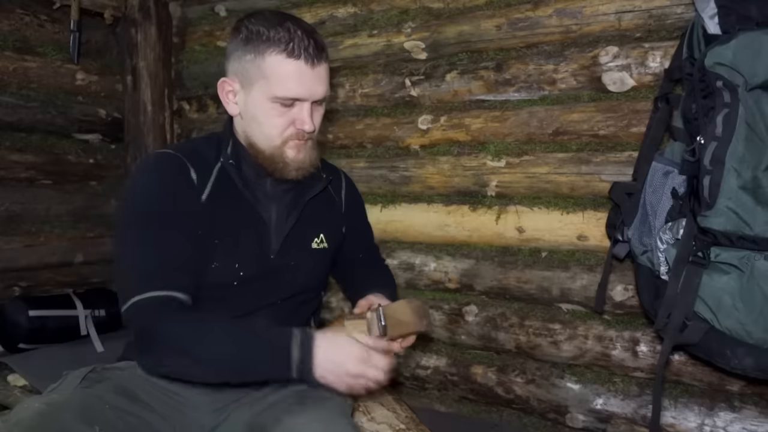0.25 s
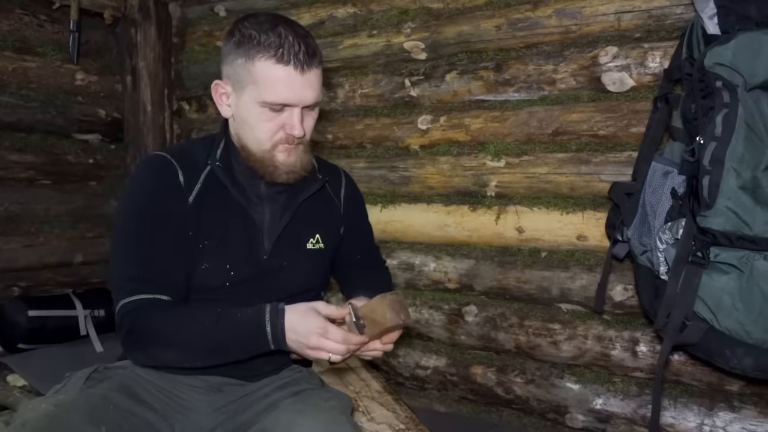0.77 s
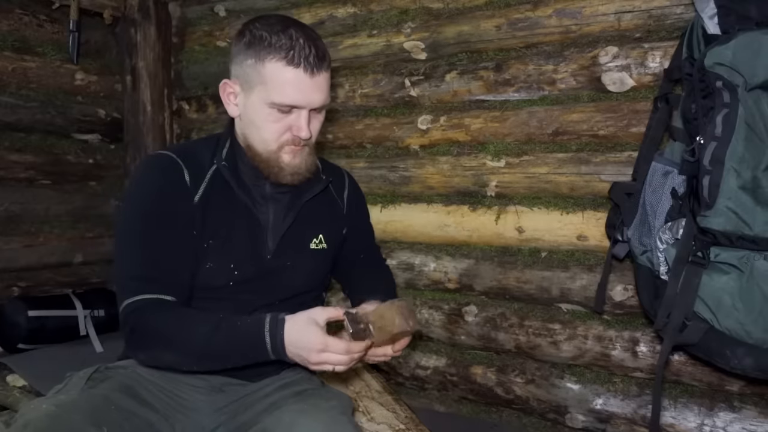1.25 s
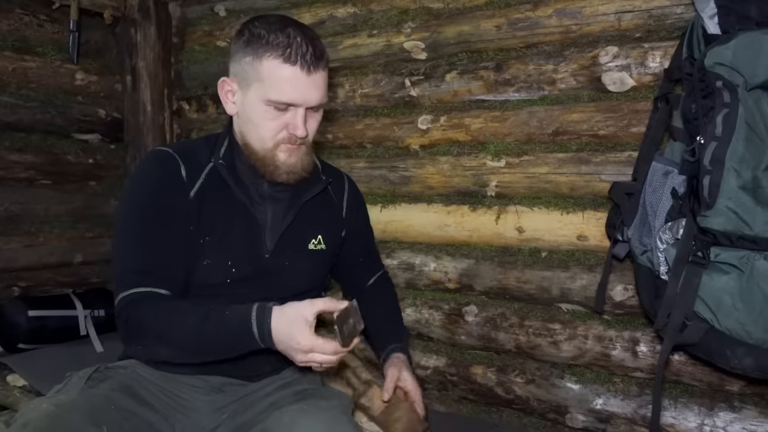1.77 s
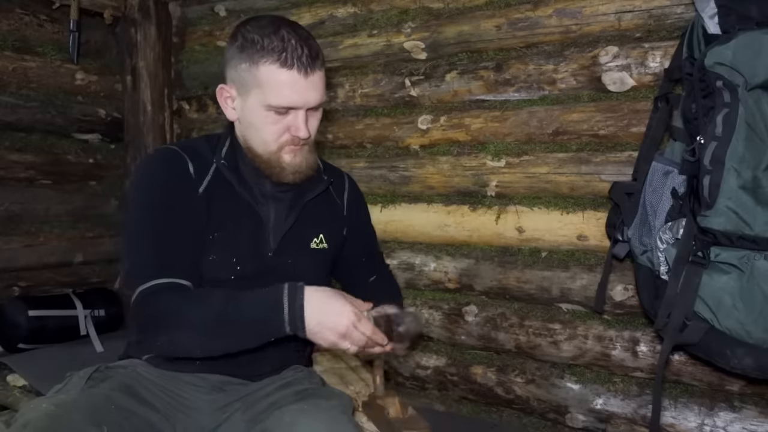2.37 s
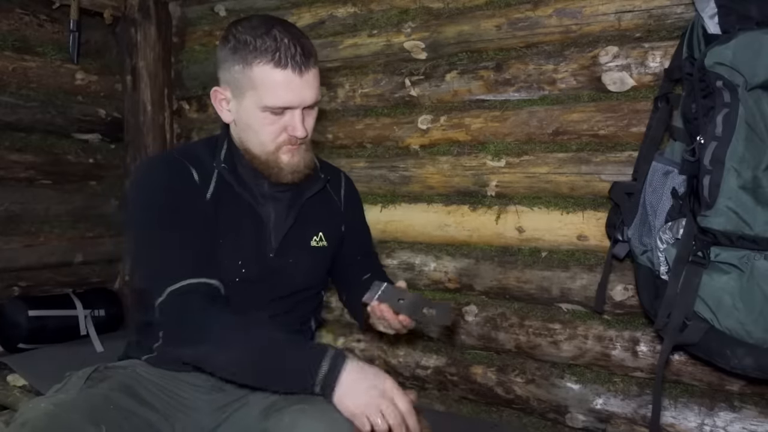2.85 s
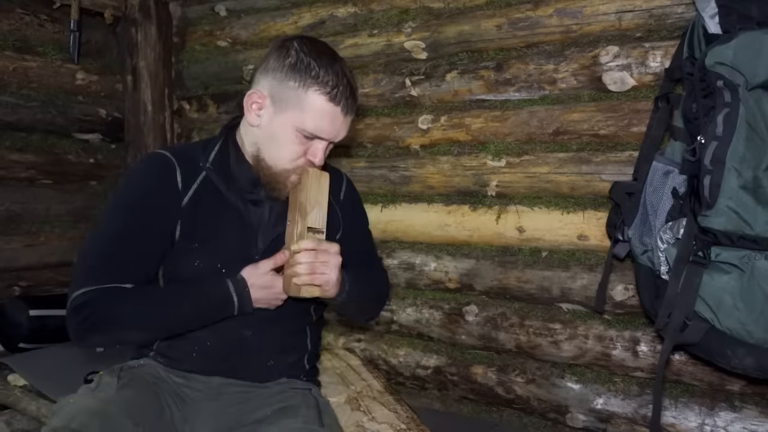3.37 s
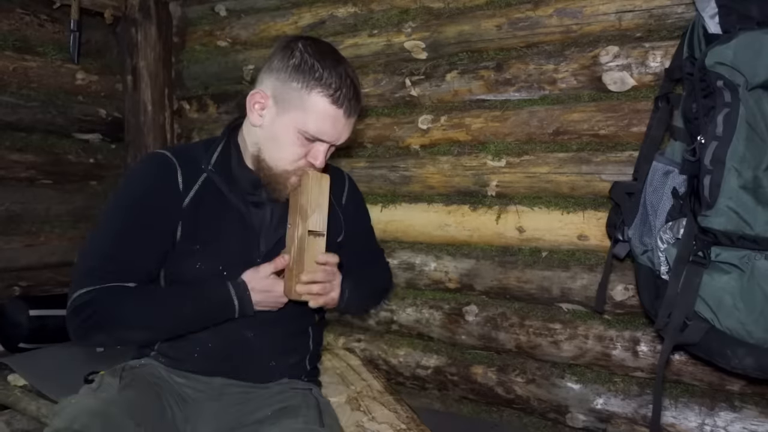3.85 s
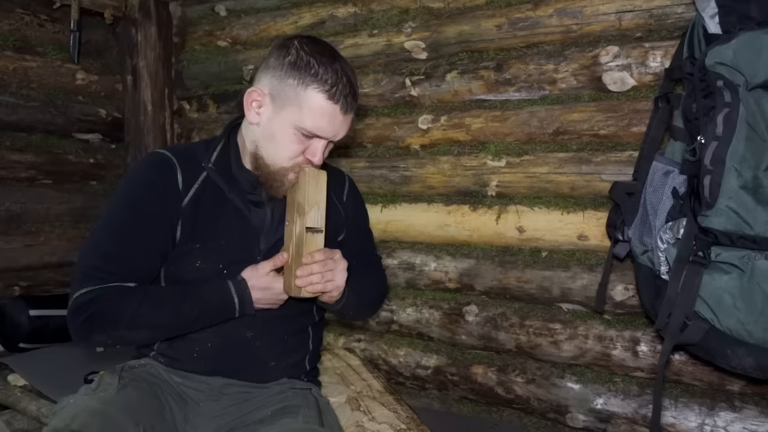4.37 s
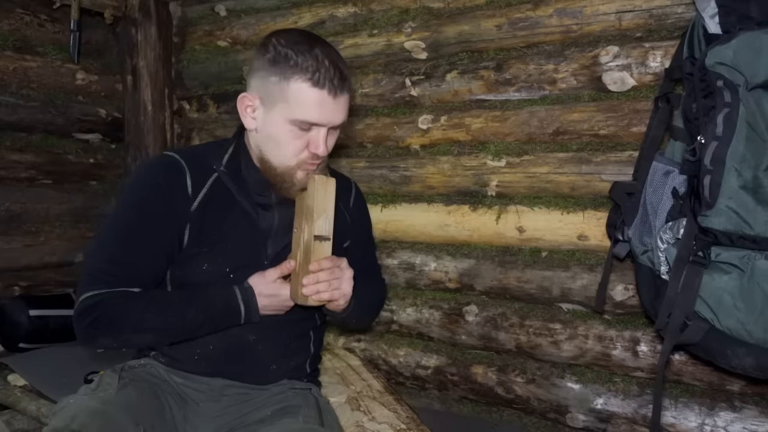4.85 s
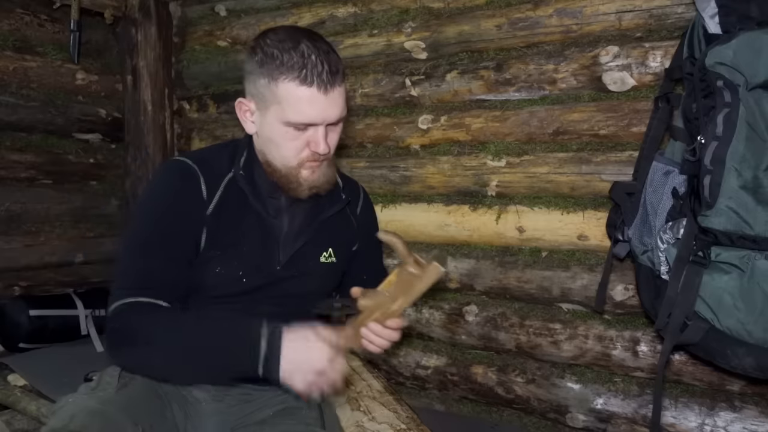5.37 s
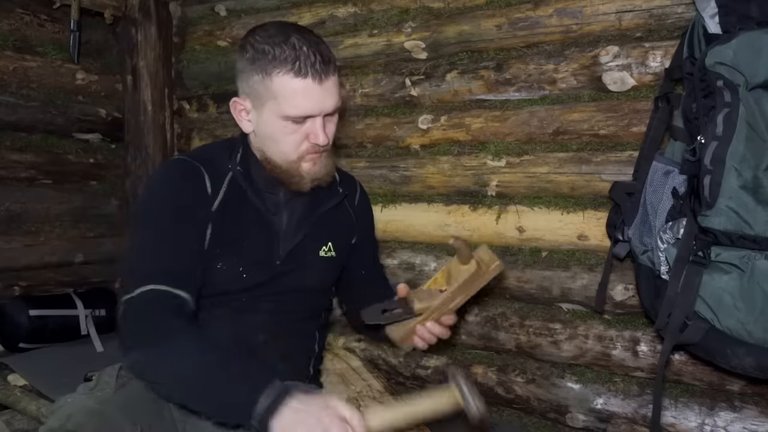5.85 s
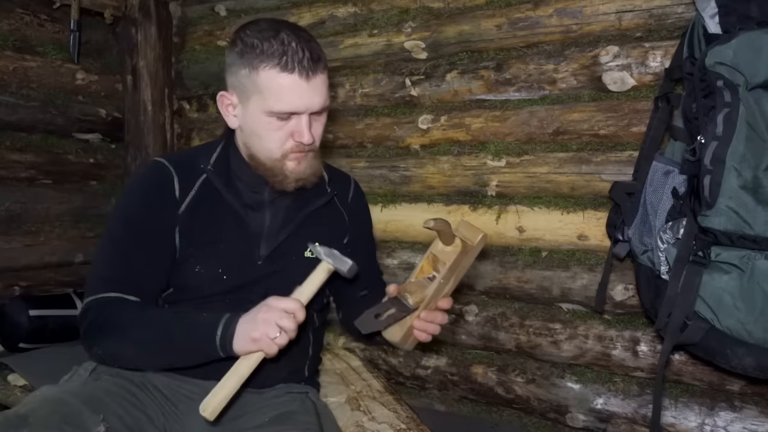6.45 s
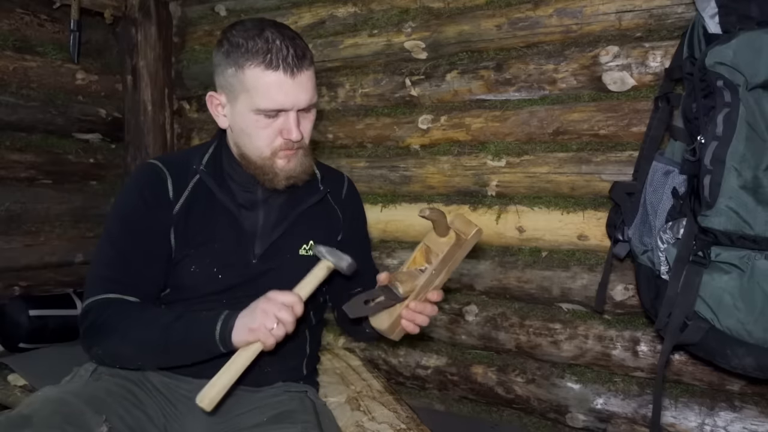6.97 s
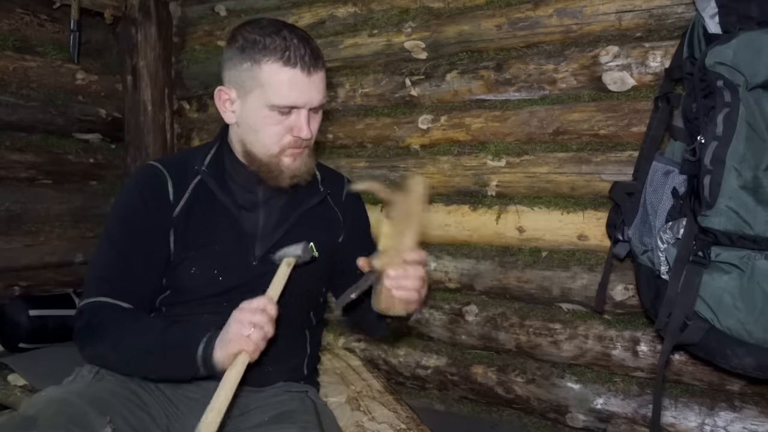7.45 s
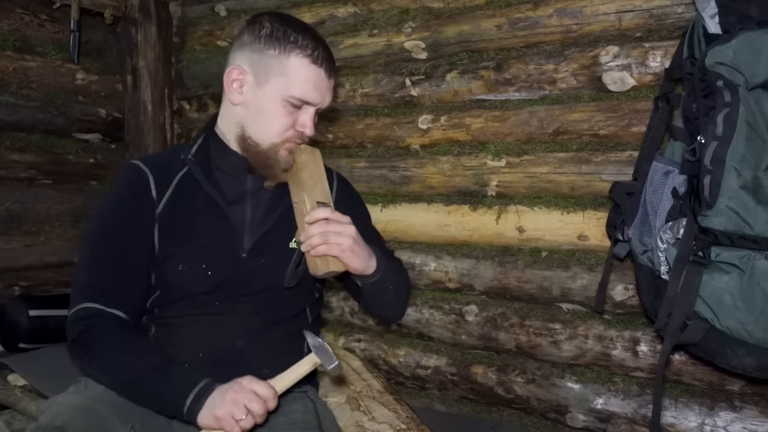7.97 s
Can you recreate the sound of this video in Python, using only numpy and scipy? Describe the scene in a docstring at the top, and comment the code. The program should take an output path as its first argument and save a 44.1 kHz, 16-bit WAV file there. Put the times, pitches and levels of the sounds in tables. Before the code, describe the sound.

Wooden plane parts clatter onto a plank bunk with dull thuds, iron scrapes and ticks, then after a quiet stretch two sharp hammer taps ring out.

```python
"""Small log shelter: a wooden hand plane is taken apart and set up again.
Parts drop on a plank bunk: wood modes, steel and rattle, then a late plank thud and a low sway of the bunk.
The iron scrapes in its slot, a tool turns in the hand and sleeves rub: friction noise through resonances.
Clacks, ticks and clinks are small decaying modes; hammer taps ring iron and wooden body, the hardest
overloading the input. Steady hiss and unsteady rumble lie underneath."""
import sys
import numpy as np
from scipy import signal
from scipy.fft import rfft, irfft, next_fast_len
from scipy.io import wavfile
from scipy.ndimage import uniform_filter1d, map_coordinates

SR = 44100
rng = np.random.default_rng(int(sys.argv[2]) if len(sys.argv) > 2 else 0)


def transcribe(u):
    """Save the signal u as a 16-bit wav file named by the first command-line argument.

    u: samples, shape (n,) or (channels, n), limited to [-1, 1]; the rate is SR.
    q: integer samples, one column per channel.
    """
    v = np.clip(np.atleast_2d(u).T, -1, 1)
    q = np.round(v * 32767).astype(np.int16)
    wavfile.write(sys.argv[1], SR, q)


N = 362061

# background hiss and rumble: (frequency [Hz], relative level [dB])
HISS_SPECTRUM = [(60, -19), (110, -1), (620, -12), (1450, -16), (6400, -20.5), (16000, -24)]
RUMBLE_SPECTRUM = [(12, -38), (25, -5.5), (59, 2.5), (86, -8), (125, -22), (260, -51)]
HISS_DB, RUMBLE_DB = -73.5, -66

# friction, bright and body part: (frequency [Hz], relative level [dB])
BRIGHT_SPECTRUM = [(1200, -20.5), (2200, -8), (4270, -3.5), (9700, -7.5), (16000, -15.5)]
BODY_SPECTRUM = [(150, -40.5), (450, -5.5), (1300, -8), (3000, -11), (5000, -37.5)]

# movements of sleeves and skin: (start [s], rise [s], hold [s], level [dB])
SLEEVE_MOVES = [(.001, 0.0012, 0.13, -67.5), (0.087, 0.14, 0.004, -60), (0.279, 0.0089, 0.3, -72.5),
                (1.444, 0.27, 0.081, -69), (1.812, 0.049, 0.18, -66.5), (2.193, 0.031, 0.2, -71),
                (2.665, 0.02, 0.093, -63.5), (2.854, 0.03, 0.029, -63), (3.036, 0.056, 0.24, -71),
                (3.585, 0.38, .04, -69.5), (4.815, 0.15, 0.14, -68), (5.142, 0.044, 0.54, -70),
                (5.363, 0.012, 0.036, -73), (5.705, 0.042, 0.035, -62.5), (7.422, 0.14, .01, -71.5),
                (7.545, 0.02, 0.1, -65.5)]
SLEEVE_FADE_DB_S, SLEEVE_STOP_DB_S = 11.5, 329

# parts landing on the bunk, often on two corners a few ms apart:
# (time [s], level [dB], plank thud against it [dB], contact [ms], favoured pitch [Hz], part [name])
LANDINGS = [(.007, -26, 2, 0.33, 515, "tool"), (0.2366, -9, -6, 0.52, 940, "tool"),
            (0.299, -23.5, 1, 0.65, 510, "tool"), (.336, -26.5, 10.5, 0.75, 933, "tool"),
            (0.406, -42, 16.5, 0.82, 610, "tool"), (.739, -24.5, -25, 0.21, 1280, "wedge"),
            (1.9237, -19.5, 0, 0.52, 752, "plane"), (1.9281, -24, -18, 0.39, 1590, "plane"),
            (1.961, -40.5, 4.5, 0.33, 1580, "plane"), (2.027, -31.5, 12.5, 0.54, 1100, "plane"),
            (2.1129, -30, -5.5, 1, 600, "plane"), (2.1189, -13, -7, 0.28, 700, "plane"),
            (2.2211, -16.5, -1.5, 0.32, 960, "plane"), (2.8922, -13.5, -17.5, 0.39, 1130, "wedge"),
            (2.896, -15, -27, 0.45, 1500, "wedge"), (2.9206, -19.5, -27.5, 0.2, 500, "wedge"),
            (2.927, -17.5, -28, .25, 1180, "wedge"), (2.957, -34, -26, 0.31, 1090, "wedge"),
            (2.992, -29, -19, 0.47, 1030, "wedge"), (3.02, -22.5, -29, 0.24, 990, "wedge"),
            (3.083, -36, -7.5, 0.88, 1060, "wedge"), (5.18, -46, -31, 0.22, 2110, "plane"),
            (5.608, -58, 11.5, 0.68, 1080, "tool"), (5.786, -55, 15.5, 0.2, 530, "tool")]
# struck plank: (frequency [Hz], relative level [dB], ring time factor [1])
PLANK_MODES = [(532, -3, 1.1), (620.3, -1, 1.4), (862.5, 7.5, 0.7), (1136, -8, 0.67), (1350, -6.5, 0.64)]
# modes of each dropped part, by name: (frequency [Hz], relative level [dB], ring time factor [1])
PART_MODES = {"tool": [(936, -4, 2.25), (1026.5, 0, 1.5), (1938, -4.5, 1.7), (2280, -9, 1.6),
              (2940, -10.5, 1.52)], "plane": [(1028, -4.5, .7), (1600, -3, 1.82), (1770, -1.5, 1.5),
              (2040, -9.5, 1.5), (3050, -9.5, 2.135)], "wedge": [(1120, -2.5, 1.1), (1640, 0, 0.85),
              (2780, -4.5, 0.95)]}
# steel fitted to the parts: mode frequencies [Hz]; level by part name [dB]
STEEL_MODES_HZ = (4723, 4940, 5155)
STEEL_LEVEL_DB = {"tool": -32.5, "plane": -29.5, "wedge": -20}
# heavy planks' late answer: (frequency [Hz], relative level [dB])
THUD_MODES = [(92, -8), (126, -2), (160, -1)]
RATTLE_DB, RATTLE_T60_S, RATTLE_LOW_HZ = -13.5, 0.058, 150.7  # rough part of a landing
THUD_BAND_HZ, THUD_NOISE_DB, THUD_T60_S = (140, 350), -14.5, 0.16  # unpitched part of the thud

# bunk swaying after each load: (start [s], rise [s], free swing [s], level [dB], nominal pitch [Hz])
SWAYS = [(0.031, 0.083, 0.094, -27, 51.7), (0.237, 0.045, 0.052, -16.5, 46.95),
         (0.363, 0.027, 0.061, -23.5, 47.64), (0.494, 0.011, 0.25, -33.5, 47.96),
         (1.762, 0.075, 0.027, -50, 44.8), (1.931, 0.18, 0.012, -26, 45.35),
         (2.17, .14, 0.0084, -33.5, 44.4), (2.345, 0.023, 0.32, -39.5, 43.2),
         (2.88, 0.042, 0.14, -43, 49.4), (3.05, 0.019, 0.23, -41.5, 48.75),
         (5.599, 0.094, 0.14, -34.5, 41.06), (5.849, 0.015, 0.45, -39.5, 39.8)]
SWAY_FADE_DB_S, SWAY_STOP_DB_S = 63, 449  # swinging free; once stopped

# hollow wooden clacks: (time [s], level [dB], pitch [Hz])
CLACK_EVENTS = [(0.117, -45.5, 342), (0.557, -54, 1450), (0.845, -48, 1670), (0.976, -54, 524),
                (1.1, -35, 1590), (1.184, -42.5, 500), (1.2, -45, 726), (1.278, -43.5, 1770),
                (1.303, -45, 470), (1.364, -40, 1583), (1.508, -51.5, 1820), (3.198, -48.5, 434.4)]
# snapping ticks, and at 2.928 s and 5.602 s the short steel ring of the landed wedge and tool: # (time [s],
# level [dB], main pitch [Hz])
TICK_EVENTS = [(0.8049, -30.5, 9140), (1.0375, -33.5, 4270), (1.268, -37.5, 4100), (2.928, -30, 4950),
               (5.2255, -43, 3870), (5.31, -46, 2260), (5.602, -38, 4960)]
# loose iron and cap touching: (time [s], level [dB])
CLINK_EVENTS = [(2.348, -46), (2.478, -54), (2.521, -46.5), (3.114, -51.5), (3.19, -58.5), (3.2495, -57),
                (3.3005, -44.5)]
# loose steel: mode frequencies [Hz]
LOOSE_MODES_HZ = (4600, 6530, 8080, 9650, 10480, 12030, 14000, 14500)
LOOSE_T60_S = 0.029

# pushes of the iron in its slot:
# (start [s], rise [s], hold [s], level [dB], body against it [dB], favoured pitch [Hz])
PUSHES = [(0.713, 0.023, 0.0058, -39.5, -6, 1600), (0.804, 0.029, 0.02, -60.5, -4, 1620),
          (0.96, 0.014, 0.046, -68, -4, 8000), (1.01, 0.045, 0.0051, -40, -12, 4430),
          (1.054, 0.029, 0.12, -61, 0, 3800), (1.064, 0.04, 0.02, -49, -25, 5800),
          (1.152, 0.0076, 0.0049, -62, -25, 7860), (1.27, 0.011, 0.031, -56, 0.5, 4400),
          (1.288, 0.028, 0.0032, -54, 3.5, 1570), (1.341, 0.023, .002, -51.5, -4, 8000),
          (1.369, 0.0091, 0.0014, -40, -23, 5600)]
# iron in its slot: (frequency [Hz], width [Hz])
SLOT_RESONANCES = [(1550, 320), (3783, 43), (4400, 54), (5700, 50), (8040, 140)]
SCRAPE_STOP_DB_S, BODY_STOP_DB_S = 958, 450  # the body part lingers

# tool turned in the hand: (start [s], rise [s], hold [s], level [dB], ringing power share [0-1])
TOOL_TURNS = [(3.189, 0.0054, 0.084, -64.5, 0.23), (5.592, 0.01, 0.069, -62.5, 0.54),
              (5.959, 0.072, 0.012, -54.5, 0.5), (6.025, 0.034, 0.19, -58.5, 0.7),
              (6.213, 0.04, 0.014, -60, 0.34), (6.241, 0.14, 0.029, -64, 0.11)]
# tool in the grip: (frequency [Hz], width [Hz], relative level [dB])
GRIP_RESONANCES = [(1910, 27, 0), (3244, 63, -3), (4070, 72, -5.5), (4830, 54, -6.5), (6680, 140, -12.5)]
TURN_STOP_DB_S = 585

SWAY_RISE, SCRAPE_RISE, RUB_RISE = 1.2, 2.3, 1.2  # power of the rise; over 1 starts slowly

# hammer on the iron:
# (time [s], level [dB], contact [ms], favoured iron pitch [Hz], favoured body pitch [Hz])
HAMMER_TAPS = [(6.854, -10.5, 0.14, 5300, 946), (7.227, 8.5, 0.07, 5420, 1230),
               (7.559, -30.5, 0.02, 2970, 1700)]
# iron wedged in the plane: (frequency [Hz], relative level [dB])
IRON_MODES = [(2300, -7), (2770, -6.5), (3180, -5.5), (3740, -0.5), (4495, -1), (5240, -1), (5415, -2),
              (5650, -5), (6890, -12), (7510, -0.5), (8960, -5.5), (9875, -1.5), (11300, -13.5)]
# wooden body of the plane: (frequency [Hz], relative level [dB])
BLOCK_MODES = [(850, -12.5), (1225, -4.5), (1560, -9.5), (1712, -2.5)]

# echo off the logs: (frequency [Hz], T60 [s])
ROOM_T60 = [(200, 0.29), (1000, 0.12), (4000, 0.12), (12000, 0.095)]

CEILING, KNEE, LOPSIDED = 0.6, 6, 0.083  # overload: top, knee hardness, extra share on one side
DISTORTION_LOW_HZ, TOP_HZ = 220, 16100  # bass edge of the distortion; band limit


def amp(db):
    """Gain of a level in dB."""
    return 10 ** (np.asarray(db) / 20)


def unit(x):
    """Scaled to rms 1."""
    return x / np.sqrt(np.mean(x ** 2) + 1e-20)


def along(points, hz):
    """Interpolates (Hz, value) points on a log frequency axis."""
    f, v = np.transpose(points)
    return np.interp(np.log(hz + 1), np.log(f + 1), v)


def wobble(rate_hz):
    """Smooth random curve, rate_hz knots a second."""
    knots = rng.standard_normal(int(N * rate_hz / SR) + 4)
    return map_coordinates(knots, [np.arange(N) * rate_hz / SR])


def filtered(x, response):
    """x through a complex response of frequency."""
    m = next_fast_len(N + SR // 2)
    return irfft(rfft(x, m) * response(np.fft.rfftfreq(m, 1 / SR)), m)[..., :N]


def noise(spectrum, grain_db=0):
    """Coloured noise, rms 1; grain makes it stick and slip and lights up patches of shifting pitch."""
    raw = rng.standard_normal(N) * amp(grain_db * (wobble(40) + wobble(900)))
    z = signal.stft(raw, nperseg=256)[2]
    patches = uniform_filter1d(rng.standard_normal(z.shape), size=4, axis=0)
    patches = unit(uniform_filter1d(patches, size=9, axis=1))
    grainy = signal.istft(z * amp(grain_db * patches), nperseg=256)[1][:N]
    return unit(filtered(grainy, lambda hz: amp(along(spectrum, hz))))


def burst_time():
    """Time axis of one blow [s]."""
    return np.arange(SR // 2) / SR


def band_noise(order, band_hz):
    """Half a second of band-passed noise, rms 1."""
    band = signal.butter(order, band_hz, "band", fs=SR, output="sos")
    return unit(signal.sosfilt(band, rng.standard_normal(SR // 2)))


def ring(modes, t60_s, contact_ms, scatter_db, damping=0.21, settle=1):
    """Struck modes, peak 1: long contact softens the attack and weakens high modes, damping shortens them."""
    t = burst_time()
    hz, db, *stretch = np.transpose(modes)[:, :, None]
    t60_s = t60_s * np.prod(stretch, axis=0)  # at 1 kHz; third column stretches it
    level = db + scatter_db * rng.standard_normal(db.shape)
    level = level - 20 * np.log10(1 + (hz * contact_ms / 500) ** 2)
    decay_db = 60 * t / t60_s * (hz / 1000) ** damping
    y = np.sum(amp(level - decay_db) * np.sin(2 * np.pi * hz * t), axis=0)
    y *= (1 - np.exp(-1000 * t / (settle * contact_ms))) ** 2
    return y / np.abs(y).max()


def favour(modes, centre_hz, boost_db):
    """The struck or rubbed spot drives modes near one pitch harder."""
    return [(hz, db + boost_db * np.exp(-(np.log2(hz / centre_hz) / 0.22) ** 2), *rest)
            for hz, db, *rest in modes]


def add(track, s, sound):
    """Mixes a sound in at time s."""
    track[round(s * SR):][:len(sound)] += sound


def room(x, wet_db):
    """Short echo off the logs, new for each blow; each frequency dies at its own speed."""
    hz, t, z = signal.stft(rng.standard_normal(SR // 4), SR, nperseg=256)
    decay = amp(-60 * t / along(ROOM_T60, hz)[:, None])
    tail = signal.istft(z * decay, SR, nperseg=256)[1]
    delayed = np.pad(x, (130, 0))  # 130 samples
    return x + amp(wet_db) * signal.fftconvolve(delayed, tail / np.linalg.norm(tail))[:len(x)]


def swell(rise_s, hold_s, db, power, fade_db_s, stop_db_s):
    """Gain over time: rises, fades slowly while held, then stops fast."""
    t = np.arange(int(SR * (rise_s + hold_s + 60 / stop_db_s))) / SR
    fade_db = fade_db_s * np.clip(t - rise_s, 0, None)
    stop_db = stop_db_s * np.clip(t - rise_s - hold_s, 0, None)
    return np.clip(t / rise_s, 0, 1) ** power * amp(db - fade_db - stop_db)


def through(sound, s, gain):
    """Stretch of a running sound let through by a gain starting at s."""
    return sound[round(s * SR):][:len(gain)] * gain


def rub(resonances, ring_db, grain_db, flicker_db=0, rate_hz=15):
    """Bright and body friction, partly through resonances that come and go as the grip shifts."""
    def responses(f):
        direct = 1 + 0 * f
        peaks = [1j * f * w / (c * c - f * f + 1j * f * w) for c, w, db in resonances]
        return np.array([direct] + peaks)

    shifting = [amp(ring_db + db + flicker_db * wobble(rate_hz)) for c, w, db in resonances]
    gains = np.array([np.ones(N)] + shifting)
    return [unit(np.sum(gains * filtered(noise(spectrum, grain_db), responses), axis=0))
            for spectrum in (BRIGHT_SPECTRUM, BODY_SPECTRUM)]


def skin_rub():
    """Bright and body friction of skin and cloth through one broad resonance."""
    return rub([(2300, 1700, 0.01)], ring_db=-4.5, grain_db=2.5, flicker_db=3.5)


def floor():
    """Steady hiss and an unsteady low rumble."""
    rumble = unit(amp(4.3 * wobble(14.0)) * noise(RUMBLE_SPECTRUM))
    return amp(HISS_DB) * noise(HISS_SPECTRUM) + amp(RUMBLE_DB) * rumble


def sleeves():
    """Friction of sleeves and skin, its body part slowly varying, gated by each movement."""
    out = np.zeros(N + SR)
    bright, body = skin_rub()
    cloth = np.pad(bright + amp(-3.0 + 0.63 * wobble(4.3)) * body, (0, SR))
    for s, rise, hold, db in SLEEVE_MOVES:
        gain = swell(rise, hold, db, RUB_RISE, SLEEVE_FADE_DB_S, SLEEVE_STOP_DB_S)
        add(out, s, through(cloth, s, gain))
    return out[:N]


def knocks():
    """Landings ring wood and rattle at once, hard contacts dying sooner; heavy planks answer ms later."""
    out, t = np.zeros(N + SR), burst_time()
    for s, db, thud_db, contact_ms, centre_hz, part in LANDINGS:
        modes = favour(PLANK_MODES + PART_MODES[part], centre_hz, boost_db=13.0)
        wood_t60_s = 0.019 + 0.046 * contact_ms
        wood = ring(modes, wood_t60_s, contact_ms, scatter_db=2.0, damping=0.2, settle=1.6)
        steel = ring([(hz, 0) for hz in STEEL_MODES_HZ], 0.025, 0.067, scatter_db=6)
        steel = steel * amp(STEEL_LEVEL_DB[part])
        rattle = band_noise(3, [RATTLE_LOW_HZ, np.clip(520 / contact_ms, 400, 9000)])
        rattle = rattle * amp(RATTLE_DB - 60 * t / RATTLE_T60_S)
        rattle = rattle * (1 - np.exp(-1000 * t / contact_ms))
        add(out, s, amp(db) * room(wood + steel + rattle, wet_db=-12.0))
        dull = band_noise(2, THUD_BAND_HZ) * amp(THUD_NOISE_DB - 60 * t / THUD_T60_S)
        late = (1 - np.exp(-t / 0.0037)) ** 2
        planks = late * ring(THUD_MODES, 0.12, 0.67, scatter_db=4.5)
        add(out, s, amp(db + thud_db) * (dull + planks))
    return out[:N]


def sway():
    """Bunk's lowest mode, unsteady in pitch and level, with a trace of its octave."""
    out = np.zeros(N)
    drift_cycles = np.cumsum(2.3 * wobble(7.2)) / SR
    for s, rise, free, db, hz in SWAYS:
        gain = swell(rise, free, db, SWAY_RISE, SWAY_FADE_DB_S, SWAY_STOP_DB_S)
        at = round(s * SR) + np.arange(len(gain))
        phase = 2 * np.pi * (hz * at / SR + drift_cycles[at])
        swing = np.sin(phase) + amp(-18.5) * np.sin(2 * phase)
        add(out, s, gain * np.sqrt(2) * swing)
    return out * amp(1.6 * wobble(16))


def clacks():
    """Hollow wood: one main mode with a weak neighbour on each side."""
    out = np.zeros(N + SR)
    for s, db, hz in CLACK_EVENTS:
        modes = [(hz, 0), (1.25 * hz, -9), (0.8 * hz, -9)]
        add(out, s, amp(db - 1.5) * room(ring(modes, 0.03, 0.3, scatter_db=2), wet_db=-5))
    return out[:N]


def slot():
    """Slot resonances; the one nearest each push's favoured pitch sings out."""
    s, rise, *_, hz = np.transpose(PUSHES)
    pitch_hz = np.exp(np.interp(np.arange(N) / SR, s + rise, np.log(hz)))
    modes = favour([(c, 0, w) for c, w in SLOT_RESONANCES], pitch_hz, boost_db=9)
    return [(c, w, db) for c, db, w in modes]


def scrapes():
    """Iron pushed in its slot: friction through the slot resonances, body part stopping more slowly."""
    out = np.zeros(N)
    bright, body = rub(slot(), ring_db=4, grain_db=3, flicker_db=3, rate_hz=30)
    for s, rise, hold, db, body_db, _ in PUSHES:
        bright_gain = swell(rise, hold, db, SCRAPE_RISE, 0, SCRAPE_STOP_DB_S)
        body_gain = swell(rise, hold, db + body_db, SCRAPE_RISE, 0, BODY_STOP_DB_S)
        add(out, s, through(bright, s, bright_gain))
        add(out, s, through(body, s, body_gain))
    return out


def ticks():
    """Snaps and short steel rings of landed parts: one main mode and random weaker ones, very short contact."""
    out = np.zeros(N + SR)
    for s, db, hz in TICK_EVENTS:
        modes = [(hz, 0)] + [(f, -7) for f in rng.uniform(3000, 15000, size=14)]
        add(out, s, amp(db - 1.5) * room(ring(modes, 0.02, 0.02, scatter_db=2), wet_db=-7))
    return out[:N]


def clinks():
    """Loose iron and cap ring high steel modes with equal decay."""
    out = np.zeros(N + SR)
    modes = [(hz, 0) for hz in LOOSE_MODES_HZ]
    for s, db in CLINK_EVENTS:
        steel = ring(modes, LOOSE_T60_S, 0.018, scatter_db=6.5, damping=0)
        add(out, s, amp(db) * room(steel, wet_db=-5))
    return out[:N]


def turns():
    """Tool turned in the hand: ringing friction of the tool and dull friction of skin share the power."""
    out = np.zeros(N)
    tool_bright, tool_body = rub(GRIP_RESONANCES, ring_db=20.5, grain_db=1.8, flicker_db=4, rate_hz=22)
    skin_bright, skin_body = skin_rub()
    tool = tool_bright + amp(-14.0) * tool_body
    skin = skin_bright + amp(-8) * skin_body
    for s, rise, hold, db, share in TOOL_TURNS:
        gain = swell(rise, hold, db, RUB_RISE, 0, TURN_STOP_DB_S)
        add(out, s, through(tool, s, gain * np.sqrt(share)))
        add(out, s, through(skin, s, gain * np.sqrt(1 - share)))
    return out


def taps():
    """Steel on steel: a crack, well-damped iron modes, longer ring of the wooden body, then the room."""
    out, t = np.zeros(N + SR), burst_time()
    small = signal.butter(6, 720, "high", fs=SR, output="sos")  # a small object radiates little bass
    for s, db, contact_ms, iron_hz, block_hz in HAMMER_TAPS:
        crack = band_noise(2, [1000, np.clip(700 / contact_ms, 2000, 15000)]) * amp(-60 * t / 0.024)
        iron_modes = favour(IRON_MODES, iron_hz, boost_db=4.5)
        iron = ring(iron_modes, 0.027, contact_ms, scatter_db=3.5, damping=0.38)
        block = ring(favour(BLOCK_MODES, block_hz, boost_db=5.5), 0.052, 0.1, scatter_db=1.0)
        block_db = 1.0 - 38 * np.log10(0.22 / contact_ms)  # longer contact gives more wood
        blow = iron + 0.48 * crack + amp(block_db) * block
        add(out, s, amp(db) * room(signal.sosfilt(small, blow), wet_db=-12.0))
    return out[:N]


def scene():
    """All sources, one channel."""
    handling = sleeves() + scrapes() + turns()
    blows = knocks() + clacks() + ticks() + clinks() + taps()
    return (floor() + handling + blows + sway())[None]


def record(dry):
    """Input stage: soft, slightly lopsided clipping whose distortion carries little deep bass; band limit."""
    distortion = dry / (1 + np.abs(dry / CEILING) ** KNEE) ** (1 / KNEE) - dry
    distortion = distortion - LOPSIDED * np.abs(distortion)
    lost_bass = filtered(distortion, lambda hz: 1 / (1 + (hz / DISTORTION_LOW_HZ) ** 2))
    return filtered(dry + distortion - lost_bass, lambda hz: 1 / (1 + (hz / TOP_HZ) ** 120))


dry = scene()
out = record(dry)
transcribe(out)
```